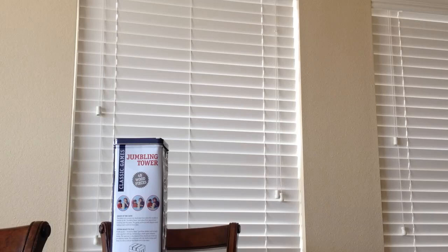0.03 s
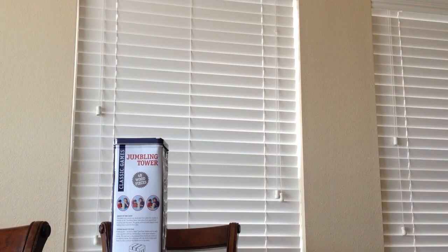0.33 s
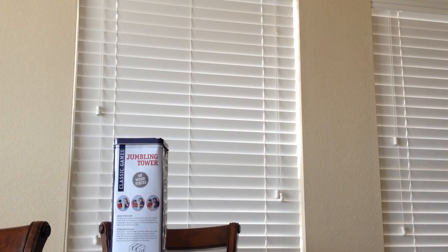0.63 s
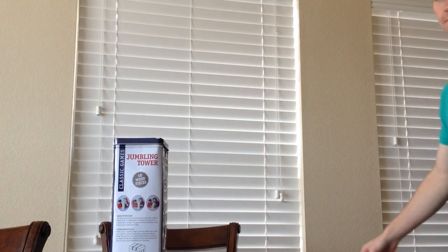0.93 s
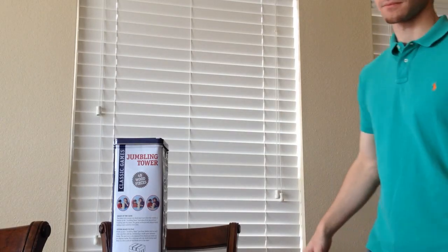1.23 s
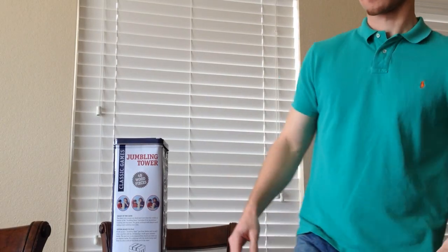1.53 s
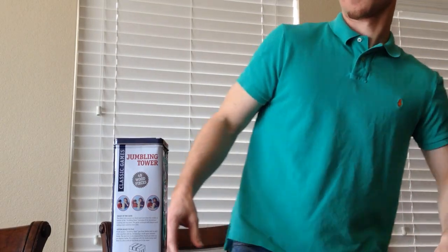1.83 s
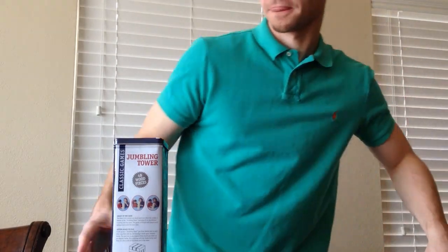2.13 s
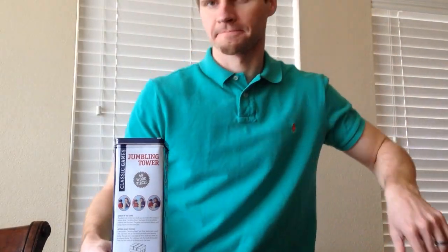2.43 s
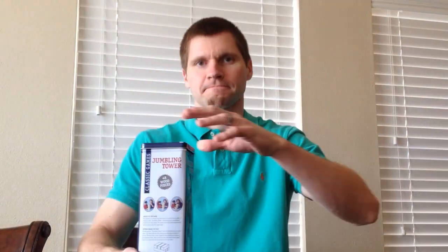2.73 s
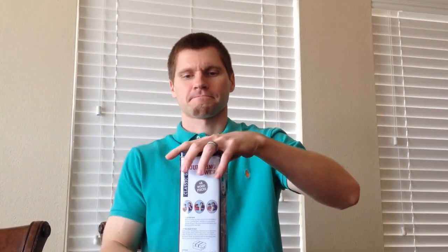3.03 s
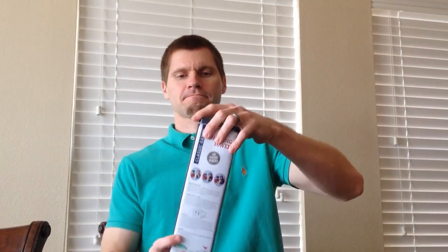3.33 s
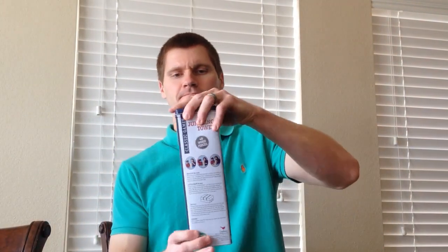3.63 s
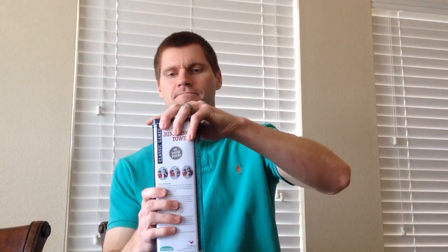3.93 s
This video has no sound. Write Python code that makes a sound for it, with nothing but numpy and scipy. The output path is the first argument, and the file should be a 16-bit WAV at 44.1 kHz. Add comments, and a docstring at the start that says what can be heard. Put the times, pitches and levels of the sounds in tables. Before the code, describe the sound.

Soft steps and chair thumps, then a sharp slap on a tin of wooden blocks.

```python
"""A tall tin of wooden blocks slides across a table, is slapped on the lid and lifted; the blocks knock.
Before that, a man walks up, clothes rustling, and settles on a wooden chair with thumps and a squeak.
Tin and blocks ring with fading tones; steps, cloth and scraping are shaped noise.
One microphone on the table hears it all, with much of the quiet, bare room's echo."""
import sys
import numpy as np
from scipy import signal
from scipy.fft import rfft, irfft
from scipy.io import wavfile
from scipy.ndimage import map_coordinates

SR = 44100
rng = np.random.default_rng(int(sys.argv[2]) if len(sys.argv) > 2 else 0)


def generate_wav(signal):
    """Clip the signal to [-1, 1] and save it as 16-bit WAV at the path in sys.argv[1]."""
    frames = np.transpose(np.atleast_2d(signal))
    scaled = np.clip(frames, -1, 1) * 32767
    pcm = np.round(scaled).astype(np.int16)
    wavfile.write(sys.argv[1], SR, pcm)


N = 176400

# The tin's own ringing tones. Each row: pitch in Hz, level in dB, seconds to fade by 60 dB.
TIN_TONES = [(480, -4, .5), (540, -9, .4), (576, -8, .4), (639, -8, .35), (777, -7, .35), (843, -1, .32),
             (928, -9, .3), (1003, -7, .5), (1242, -3, .4), (1337, -6, .35), (1411, 0, .28),
             (1857, -13, .45), (2837, -17, .35)]


def amp(db):
    """Turn decibels into a gain."""
    return 10 ** (np.asarray(db) / 20)


def unit(x):
    """Scale a sound to an average power of 1."""
    return x / np.sqrt(np.mean(x ** 2) + 1e-20)


def along(points, hz):
    """Read between (Hz, value) points on a log frequency axis."""
    freqs, values = np.transpose(points)
    return np.interp(np.log(hz + 1), np.log(freqs + 1), values)


def level(rows):
    """A gain that follows (seconds, dB) points and is silent outside them."""
    times, db = np.transpose(rows)
    return amp(np.interp(np.arange(N) / SR, times, db, left=-np.inf, right=-np.inf))


def coloured(x, spectrum):
    """Shape a sound's bass and treble, then set its power to 1."""
    gains = amp(along(spectrum, np.fft.rfftfreq(len(x), 1 / SR)))
    return unit(irfft(rfft(x) * gains, len(x)))


def noise(spectrum, size=SR):
    """Noise with the given tone colour."""
    return coloured(rng.standard_normal(size), spectrum)


def fade(t60):
    """A one-second fade that falls 60 dB every t60 seconds."""
    return np.exp(-np.log(1000) * np.arange(SR) / SR / t60)


def rise(seconds):
    """A soft start, climbing from 0 towards 1."""
    return 1 - np.exp(-np.arange(SR) / SR / seconds)


def ring(tones, scatter_db, detune):
    """A struck object's fading tones, a little different at each blow."""
    out, t = np.zeros(SR), np.arange(SR) / SR
    for hz, db, t60 in tones:
        gain = amp(db + scatter_db * rng.normal()) * rng.choice([-1, 1])
        pitch = hz * (1 + detune * rng.normal())
        out += gain * fade(t60) * np.sin(2 * np.pi * pitch * t)
    return out


def add(track, start, sound):
    """Mix a sound in at a start time in seconds."""
    part = track[round(start * SR):][:len(sound)]
    part += sound[:len(part)]


def room(x, wet_db):
    """The direct sound, first echoes off the walls and a tail whose high treble dies soonest."""
    # The echo's length. Each row: frequency in Hz, seconds to fade by 60 dB.
    echo_times = [(150, 0.76), (500, 0.71), (1500, 0.97), (5500, 0.78), (8000, 0.59), (14000, 0.25)]
    hz, t, bands = signal.stft(rng.standard_normal(SR), SR, nperseg=256)
    bands = bands * np.exp(-np.log(1000) * t / along(echo_times, hz)[:, None])
    tail = signal.istft(bands, SR, nperseg=256)[1][:SR] * rise(0.0072)
    delays_s = .002 + .03 * rng.random(size=14)
    walls = np.bincount((delays_s * SR).astype(int), rng.standard_normal(size=14), SR)
    echo = amp(wet_db) * (tail / np.linalg.norm(tail) + amp(-1.5) * walls / np.linalg.norm(walls))
    echo[0] = 1  # the direct sound
    return signal.fftconvolve(x, echo / np.linalg.norm(echo))[:N]


def friction(spectrum, grainy, slips_per_s=900):
    """Rubbing surfaces make tiny random slips over a smooth hiss."""
    slips = (rng.random(N) < slips_per_s / SR) * rng.standard_normal(N)
    return coloured(rng.standard_normal(N) + grainy * unit(slips), spectrum)


def room_tone():
    """Steady air noise and a faint hum."""
    # The air's colour and the hum's tones. Each row: frequency in Hz, level in dB.
    air_colour = [(15, -63), (25, -33), (86, -27), (101, -11.5), (122, -7), (245, -5.5), (347, -6),
                  (397, -8), (519, -11.5), (679, -11.5), (842, -8.5), (1100, -12), (1330, -13), (2100, -19),
                  (6140, -18), (8480, -31.5), (15300, -27)]
    hum_tones = [(118.4, -73.5), (269, -76.5), (463, -74.5)]
    t = np.arange(N) / SR
    hum = sum(amp(db) * np.sqrt(2) * np.sin(2 * np.pi * hz * t) for hz, db in hum_tones)
    return amp(-62) * noise(air_colour, size=N) + hum


def clothes():
    """Cloth rubs on cloth: a rustle, one long swish of trouser legs and fine crinkles of the shirt."""
    # How loud the rustle and swish are. Each row: time in seconds, level in dB.
    rustle_levels = [(.08, -57.5), (.19, -58), (.3, -70), (.5, -64.5), (.78, -75), (.88, -61), (.97, -59.5),
                     (1.06, -57.5), (1.12, -63), (1.32, -71.5), (1.39, -55), (1.47, -58.5), (1.56, -65.5),
                     (1.77, -69.5), (1.9, -61), (2.08, -58.5), (2.22, -63.5), (2.34, -60.5), (2.5, -60.5),
                     (2.7, -64.5), (3.25, -59), (3.4, -65), (3.49, -51.5), (3.54, -62), (3.61, -52.5),
                     (3.72, -73), (3.84, -62.5), (4, -64)]
    swish_levels = [(.86, -77), (.95, -55), (1.05, -57.5), (1.1, -77)]
    # The crinkles. Each row: time of the peak in seconds, level in dB, half-width in seconds.
    crinkles = [(2.304, -68, .05), (2.392, -63.5, 0.022), (3.49, -67, 0.032), (3.594, -63, .03),
                (3.836, -68, 0.059)]
    # The colour of each sound. Each row: frequency in Hz, level in dB.
    rustle_colour = [(100, -2), (400, 1), (1200, -3), (2200, -3.5), (4200, -4.5), (5900, 3), (6700, -2.5),
                     (8200, -16), (12000, -22), (15500, -19.5)]
    swish_colour = [(300, -17), (2500, -16), (4200, -1.5), (5000, 1), (6000, 7.5), (6800, -15), (8200, -24),
                    (15000, -28)]
    crinkle_colour = [(1000, -23), (5000, 1), (10000, -3), (15000, -4)]
    t = np.arange(N) / SR
    rustle = level(rustle_levels) * friction(rustle_colour, grainy=0.4)
    swish = level(swish_levels) * noise(swish_colour, size=N)
    swells = sum(amp(db) * np.exp(-((t - peak) / width) ** 2) for peak, db, width in crinkles)
    crinkle = swells * friction(crinkle_colour, grainy=0.89)
    return room(rustle + swish + crinkle, wet_db=-9.5)


def footsteps():
    """Soft steps, heard mostly through the room: heels are dull, scuffs brighter."""
    # Each row: start in seconds, level in dB, seconds to fade by 60 dB, brightness in dB per octave.
    steps = [(.176, -47.5, 0.13, 0), (.377, -52, 0.26, -3), (.41, -53, .25, -3), (.915, -58, .3, -6),
             (1.355, -50, 0.21, -0.5), (1.405, -52.5, .2, 2.5), (1.983, -41, 0.13, -0.5),
             (2.129, -53.5, .15, 6)]
    # The colour of a shoe on the floor. Each row: frequency in Hz, level in dB.
    shoe_colour = [(70, -31), (170, 1.5), (300, -4.5), (500, 2.5), (780, -0.5), (1100, -7.5), (1900, -18),
                   (3500, -11.5), (6000, -52), (15000, -44)]
    out, pivot_hz = np.zeros(N), 500
    for start, db, t60, brightness in steps:
        colour = [(hz, shoe_db + brightness * np.log2(hz / pivot_hz)) for hz, shoe_db in shoe_colour]
        step = noise(colour) * rise(0.0024) * fade(t60)
        add(out, start, amp(db) * room(step, wet_db=.5))
    return out


def furniture_thumps():
    """Weight on the chair and table swells and dies as a low, rubbing boom; the table hums on."""
    # Each row: start in seconds, level in dB, pitch in Hz, seconds to swell to the peak.
    thumps = [(.376, -51, 174, 0.014), (2.131, -45, 186, 0.005), (2.429, -46.5, 239, 0.014),
              (2.446, -46, 172.4, 0.018), (2.482, -47, 170, 0.024), (2.657, -32, 180.2, .021),
              (2.705, -35.5, 186, .012), (3.185, -46.5, 187, 0.014)]
    # The table top's low note. Its row: pitch in Hz, level in dB, seconds to fade by 60 dB.
    table_note = [(195, -12.5, 0.57)]
    # The colour of the rubbing. Each row: frequency in Hz, level in dB.
    rub_colour = [(70, -30), (140, -5), (280, -3), (450, -14), (2000, -50), (6000, -80)]
    booms, rubs, t = np.zeros(N), np.zeros(N), np.arange(SR) / SR
    for start, db, hz, swell_s in thumps:
        progress = (t / swell_s) ** 2
        swell = progress * np.exp(1 - progress)
        boom = np.sin(2 * np.pi * hz * t) * swell
        hum = ring(table_note, scatter_db=-2.5, detune=0) * rise(swell_s)
        add(booms, start, amp(db) * (boom + hum))
        add(rubs, start, amp(db - 8.5) * noise(rub_colour) * swell)
    return booms + room(rubs, wet_db=-3)


def blocks():
    """Wooden blocks fall against the tin's wall with a dull ring and a clack."""
    # Each row: start in seconds, level in dB, the clack's extra level in dB.
    knocks = [(2.591, -29, -9.5), (2.612, -35, -6.5), (2.974, -34.5, -1), (2.996, -32.5, -11),
              (3.030, -28, -1), (3.040, -30.5, -2), (3.066, -36.5, -2), (3.198, -38.5, -4.5),
              (3.333, -41.5, -12), (3.541, -37.5, -7), (3.569, -36.5, -6), (3.611, -38, -3.5),
              (3.804, -44.5, -16), (3.865, -32, -4.5), (3.9, -26.5, -7), (3.912, -33, -14),
              (3.956, -29.5, -14.5)]
    # The loaded tin's dull tones. Each row: pitch in Hz, level in dB, seconds to fade by 60 dB.
    dull_tones = [(316, -14, .13), (467.6, -4.5, 0.084), (527.5, -2.5, 0.063), (623, -10.5, 0.07),
                  (779, -11.5, 0.077), (1017, -20, 0.18), (1177, -16, 0.093), (2430, -30.5, .1)]
    # The clack's colour. Each row: frequency in Hz, level in dB.
    clack_colour = [(100, -23), (250, 0), (550, 2), (1300, 0.5), (1900, -9.5), (3300, -15.5), (6000, -25.5),
                    (15000, -45)]
    out = np.zeros(N)
    for start, db, clack_db in knocks:
        onset = rise(0.00084 * amp(-clack_db))  # a softer contact starts more slowly
        dull = ring(dull_tones, scatter_db=1, detune=0.014) * onset
        clack = amp(clack_db) * noise(clack_colour) * fade(t60=0.095) * onset
        add(out, start, amp(db) * (room(dull, wet_db=-8.5) + room(clack, wet_db=1.5)))
    return out


def tin_slide():
    """The tin scrapes unevenly across the table, which also makes it ring."""
    # How loud the slide is. Each row: time in seconds, level in dB.
    slide_levels = [(2.6, -61), (2.72, -52.5), (2.81, -43), (2.91, -42), (3.02, -44.5), (3.1, -64),
                    (3.2, -43), (3.26, -57.5), (3.34, -52), (3.5, -70)]
    # The scrape's colour. Each row: frequency in Hz, level in dB.
    scrape_colour = [(100, -33), (188, -5.5), (400, -4), (560, -5), (770, -2), (1260, -10), (1700, -10.5),
                     (2400, -14.5), (3200, -16.5), (4350, -18.5), (6090, -12), (8170, -31), (15000, -35)]
    judder_db, judder_per_s, singing_db = 1.5, 45, -8
    judder = map_coordinates(rng.standard_normal(1000), [np.arange(N) * judder_per_s / SR], mode="wrap")
    singing = signal.fftconvolve(rng.standard_normal(N), ring(TIN_TONES, scatter_db=-1, detune=0))[:N]
    scrape = friction(scrape_colour, grainy=1.03) * amp(judder_db * judder)
    return room(level(slide_levels) * (scrape + amp(singing_db) * unit(singing)), wet_db=-5.5)


def squeak():
    """One faint falling tone as the man settles."""
    # Each row: time in seconds, pitch in Hz, level in dB.
    glide = [(2.70, 927, -61), (2.716, 885, -40.5), (2.735, 724, -48), (2.756, 650, -39), (2.772, 640, -66)]
    times, hz, db = np.transpose(glide)
    phase = 2 * np.pi * np.cumsum(np.interp(np.arange(N) / SR, times, hz)) / SR
    return room(level(np.transpose([times, db])) * np.sin(phase), wet_db=-3)


def lid_slap():
    """Each hit cracks, shimmers in the thin metal and rings the lid and the tin."""
    # The hand lands, then fingers and the lid chatter on the rim.
    # Each row: start in seconds, level in dB, the crack's extra level in dB.
    hits = [(3.0272, -19.5, 2), (3.034, -24, 0), (3.041, -26, 5), (3.047, -29, -5), (3.189, -34.5, -10.5),
            (3.2, -34, -5.5), (3.445, -40, -16), (3.588, -48, 2), (3.898, -45, -8), (3.912, -46, -8)]
    # The lid's tones. Each row: pitch in Hz, level in dB, seconds to fade by 60 dB.
    lid_tones = [(3700, -20, .6), (4834, -14, .9), (5182, -10, .8), (5403, -13, .5), (5626, -11, .45),
                 (5757, -10, .45), (5967, -10, .45), (6198, -12, .45), (6415, -15, .5)]
    # The colours of the crack and the first snap of skin on metal. Each row: frequency in Hz, level in dB.
    crack_colour = [(40, -5), (100, -23), (200, -1), (500, -8), (1350, 2.5), (2000, -9.5), (3000, -11.5),
                    (4800, -2.5), (5500, 1.5), (6200, 5.5), (6900, -7), (8500, -16), (12000, -16),
                    (15500, -32)]
    snap_colour = [(300, -27), (2500, -14), (3800, 0), (4600, -12), (5900, 7), (7000, -4), (8500, -20),
                   (12000, -12), (15500, -21)]
    out, ringing = np.zeros(N), np.zeros(N)
    onset, shimmer = rise(0.00026), amp(-9.5) * fade(t60=0.17)
    for start, db, crack_db in hits:
        crack = noise(crack_colour) * (amp(crack_db) * fade(t60=0.012) + shimmer) * onset
        # Each hit rings at slightly different, random pitches.
        tin = ring(TIN_TONES, scatter_db=-1, detune=0.002)
        lid = amp(-1.5) * ring(lid_tones, scatter_db=5.5, detune=0.00094)
        add(out, start, amp(db) * room(crack, wet_db=-5.5))
        add(ringing, start, amp(db - 17) * (tin + lid) * rise(0.0029))
    start, db, _ = hits[0]
    snap = noise(snap_colour) * fade(t60=0.0059) * onset
    add(out, start, amp(db + 5) * room(snap, wet_db=-2))
    return out + room(ringing, wet_db=-15)


def scene():
    """Everything reaches one microphone, the same in both channels."""
    mono = lid_slap() + blocks() + furniture_thumps() + footsteps()
    mono += clothes() + tin_slide() + squeak() + room_tone()
    return np.array([mono, mono])


def record(dry):
    """The recorder opens after a moment and cuts the deep bass and the highest treble."""
    start_s, low_cut_hz, top_hz = .071, 105, 15400
    opened = dry * (np.arange(N) / SR > start_s)
    thinned = signal.sosfilt(signal.butter(4, low_cut_hz, "high", fs=SR, output="sos"), opened)
    below_top = np.fft.rfftfreq(2 * N, 1 / SR) < top_hz
    return irfft(rfft(thinned, 2 * N) * below_top)[:, :N]


dry = scene()
out = record(dry)
generate_wav(out)
```